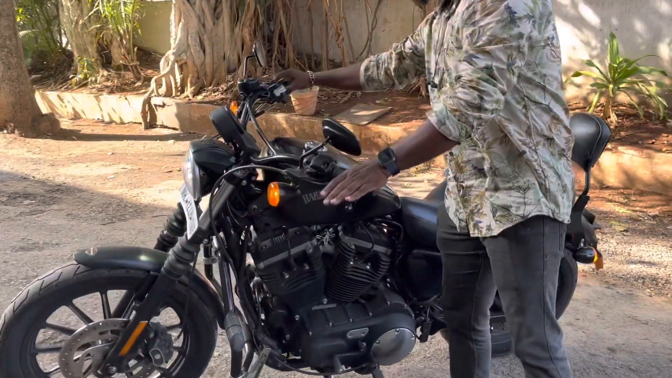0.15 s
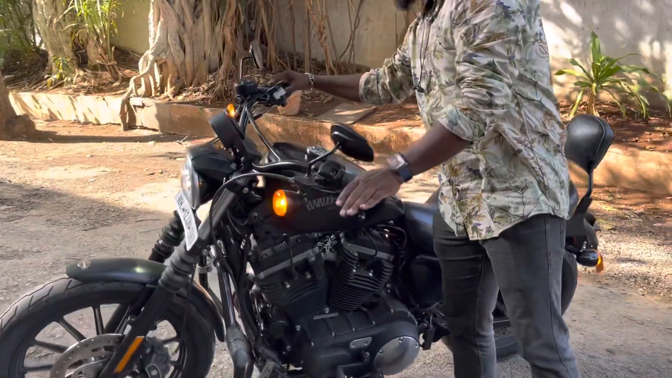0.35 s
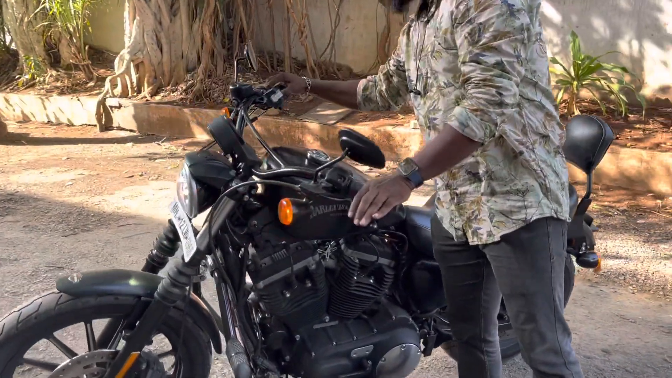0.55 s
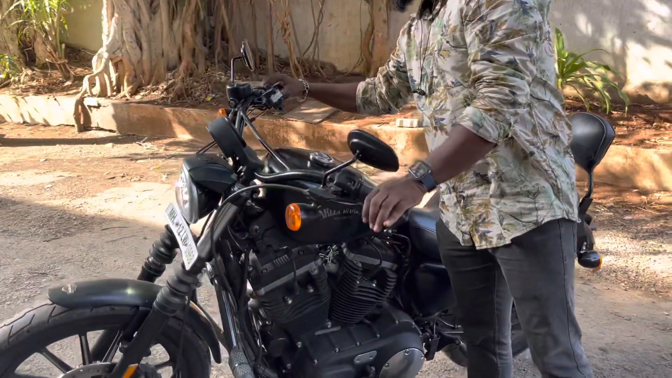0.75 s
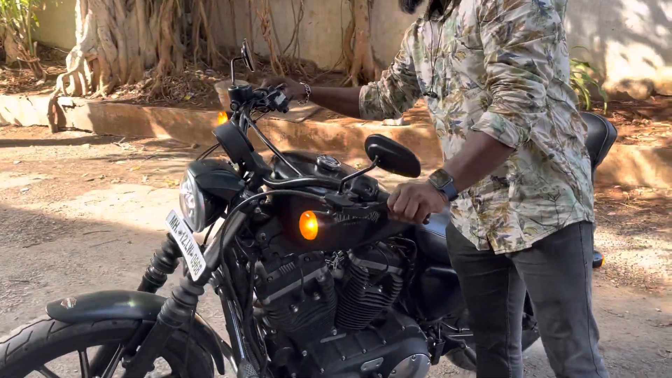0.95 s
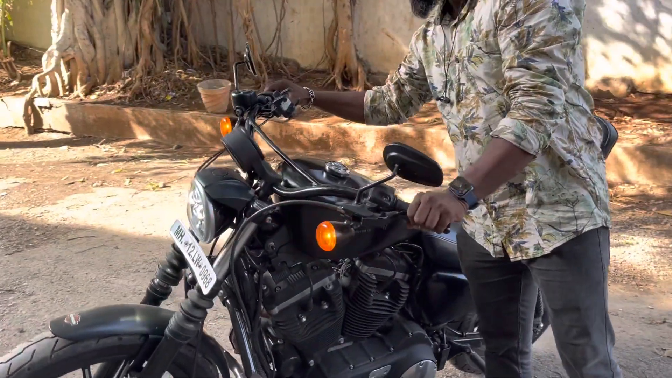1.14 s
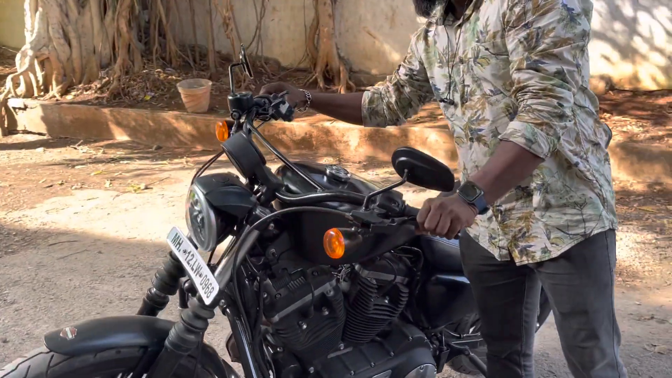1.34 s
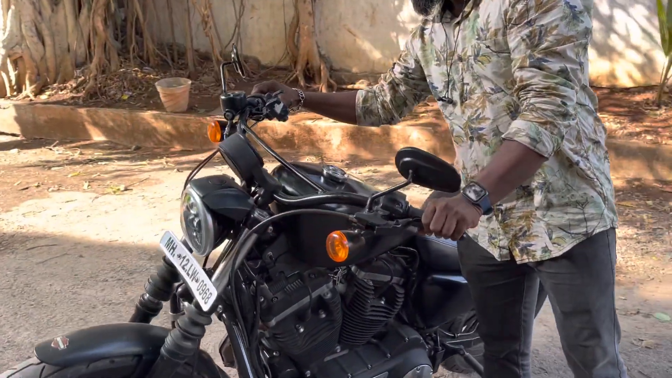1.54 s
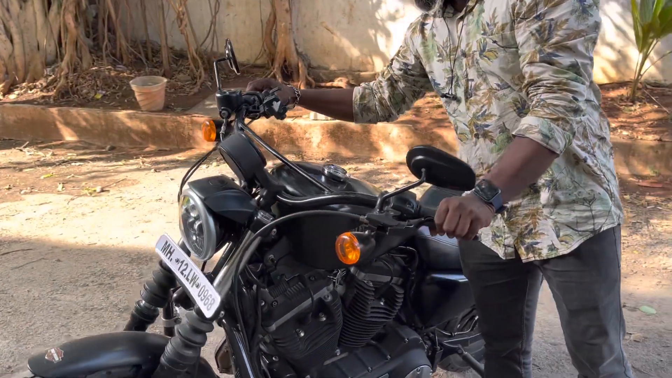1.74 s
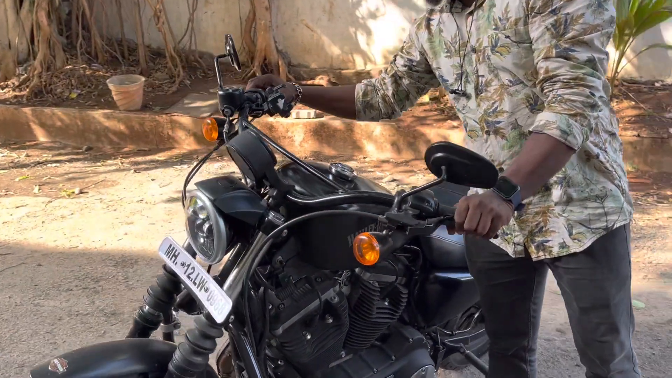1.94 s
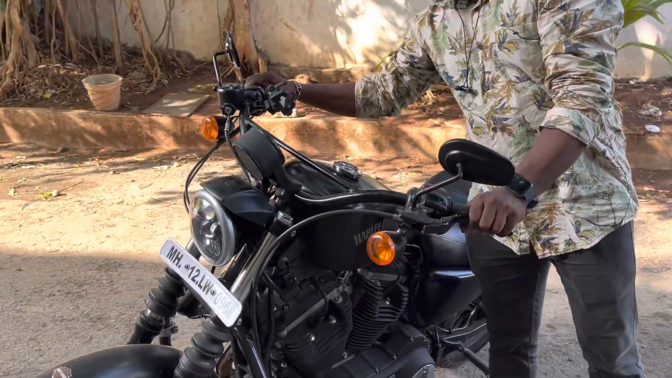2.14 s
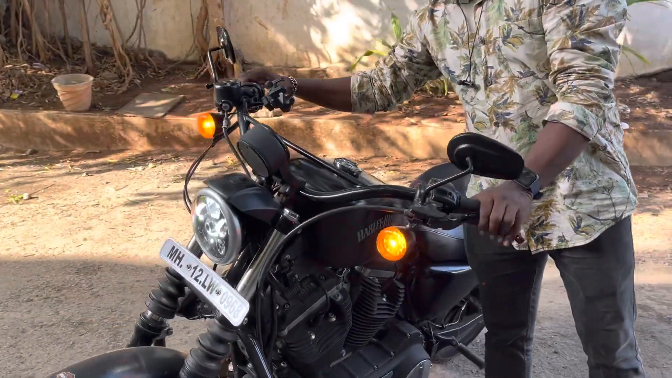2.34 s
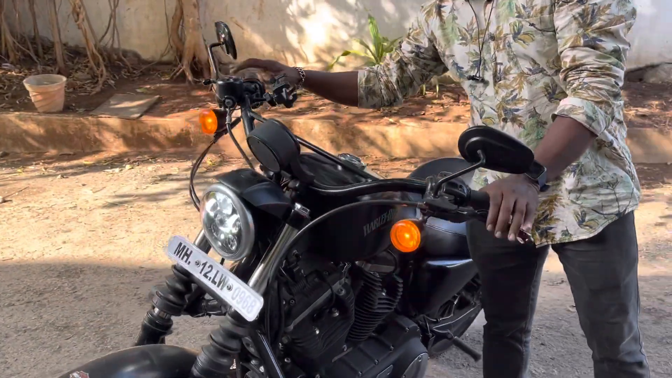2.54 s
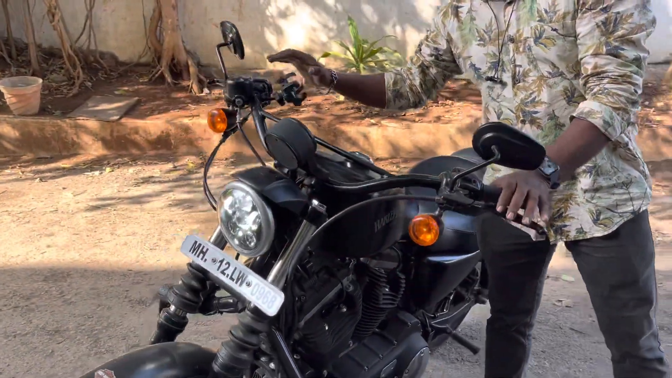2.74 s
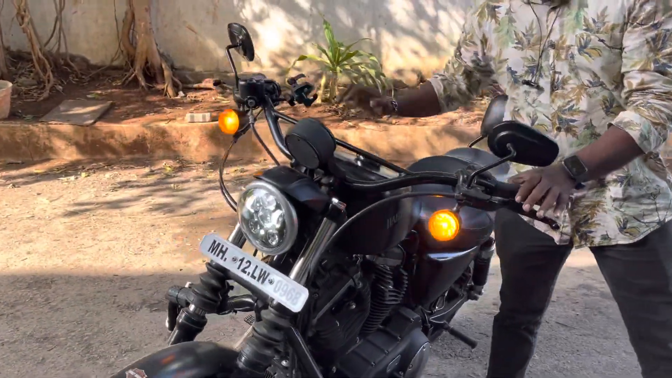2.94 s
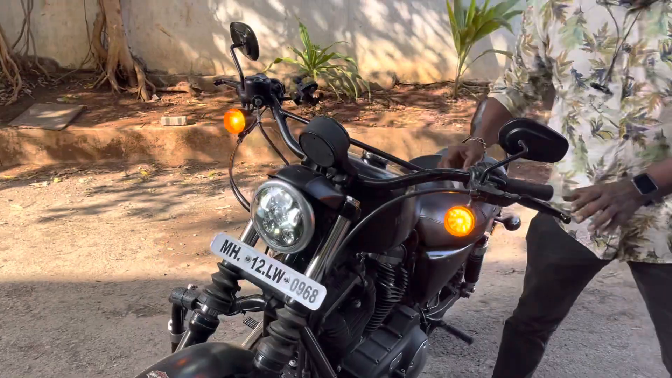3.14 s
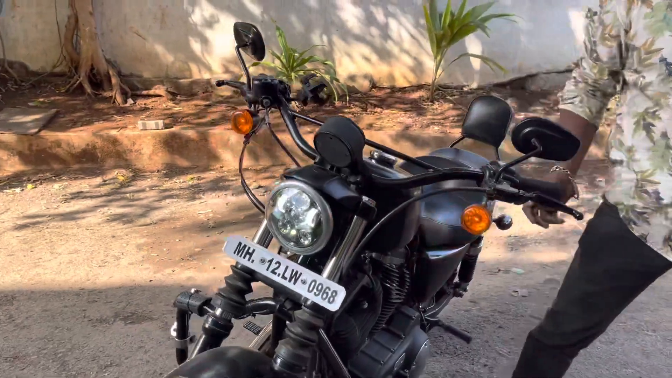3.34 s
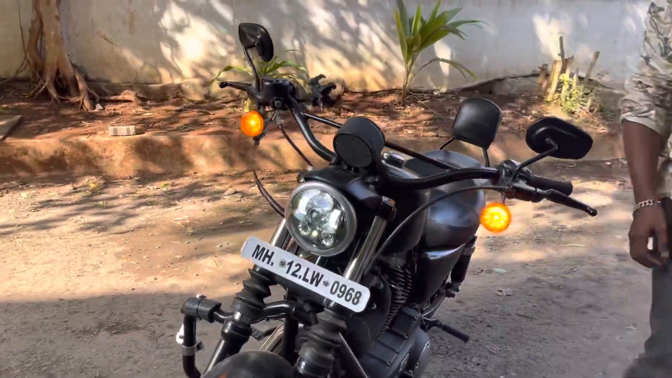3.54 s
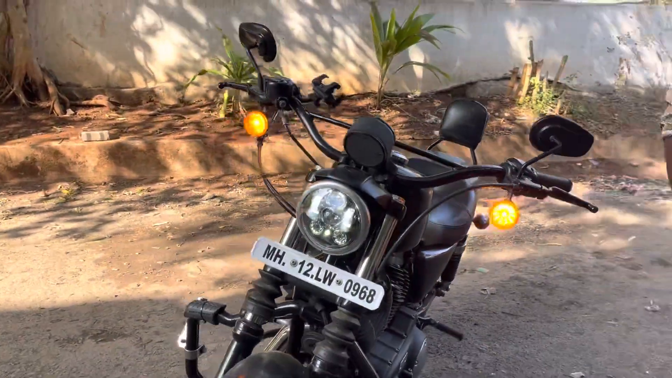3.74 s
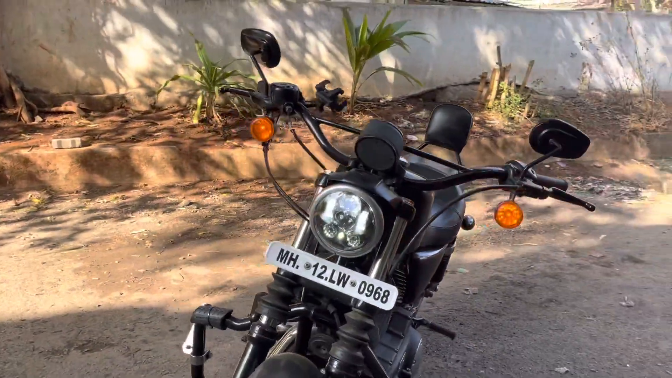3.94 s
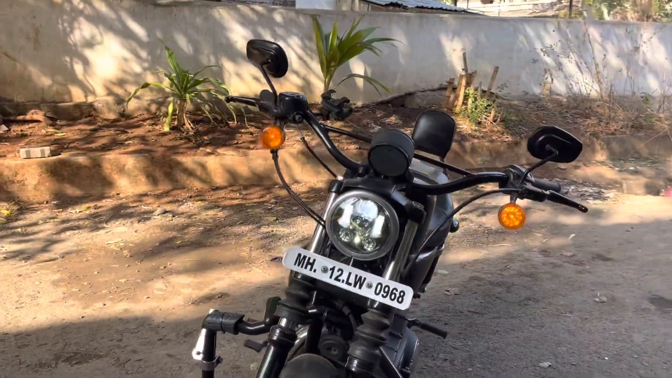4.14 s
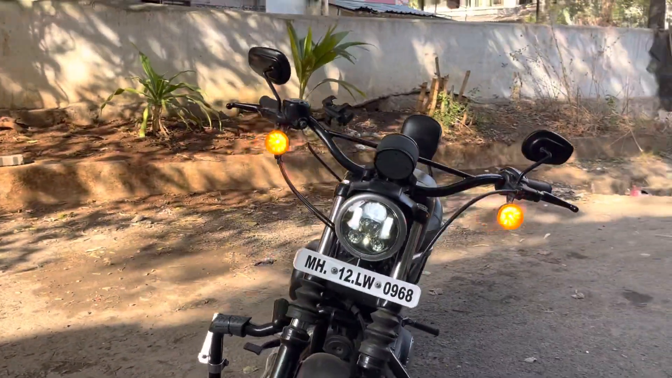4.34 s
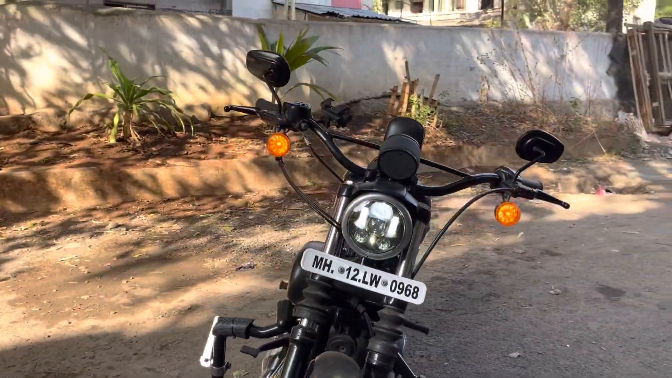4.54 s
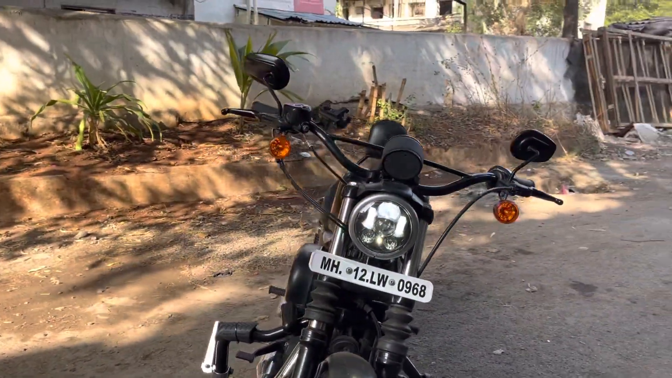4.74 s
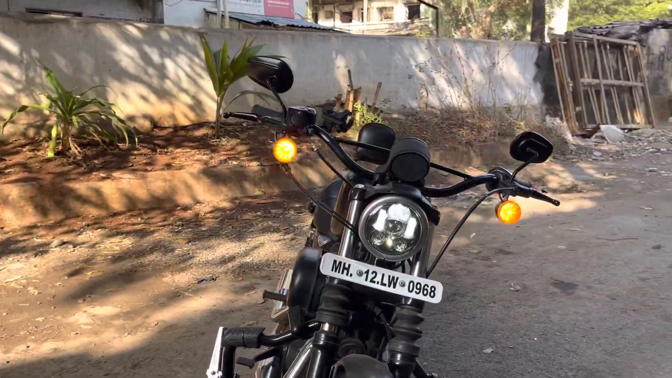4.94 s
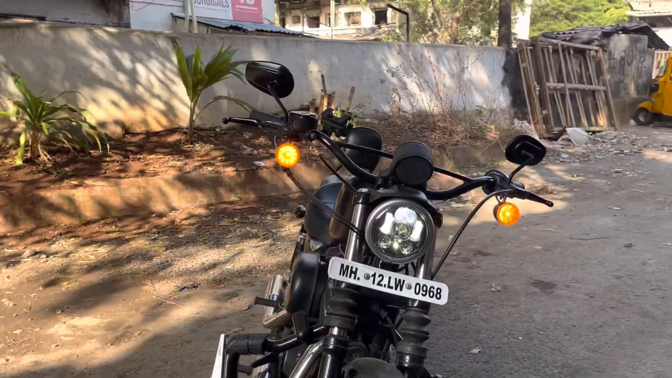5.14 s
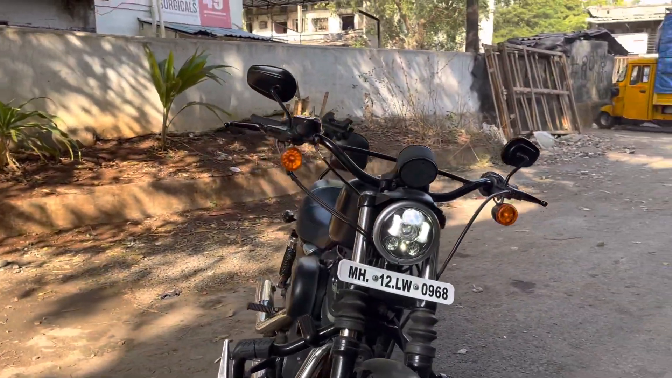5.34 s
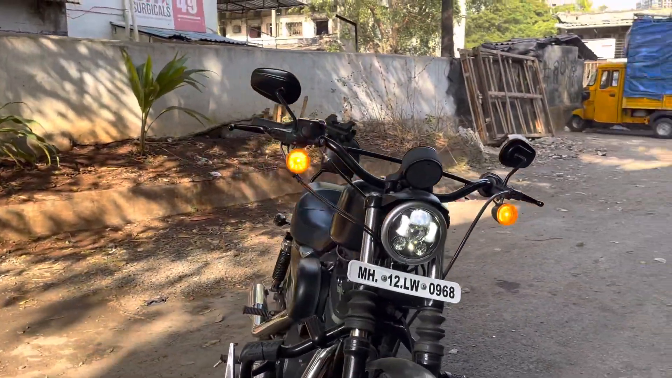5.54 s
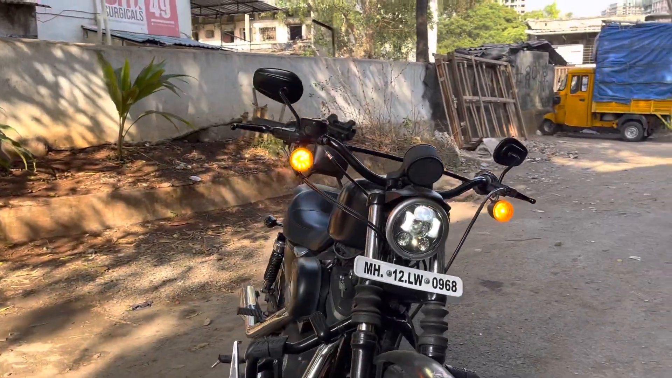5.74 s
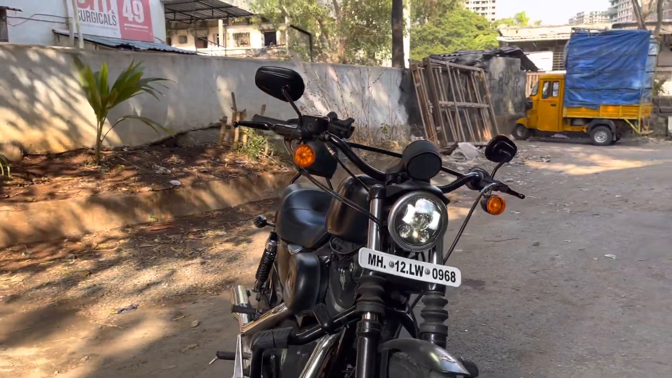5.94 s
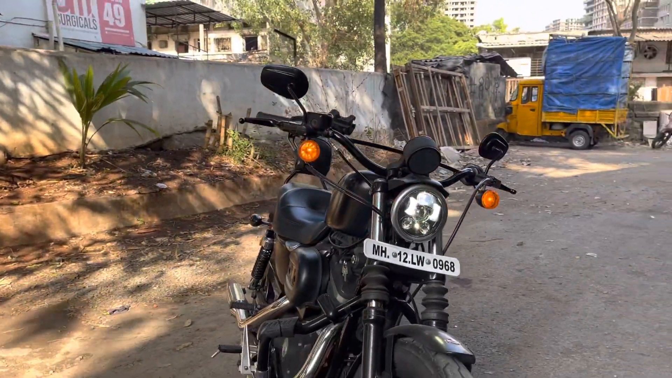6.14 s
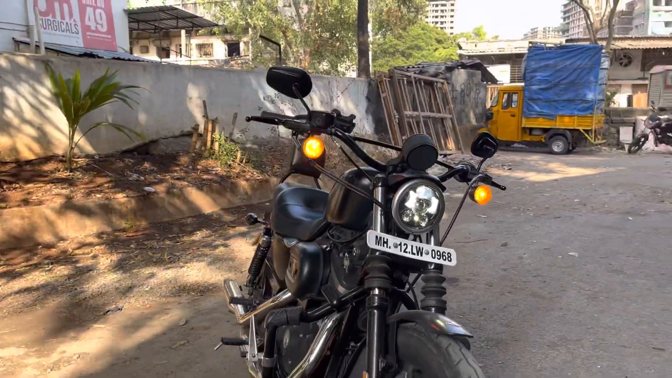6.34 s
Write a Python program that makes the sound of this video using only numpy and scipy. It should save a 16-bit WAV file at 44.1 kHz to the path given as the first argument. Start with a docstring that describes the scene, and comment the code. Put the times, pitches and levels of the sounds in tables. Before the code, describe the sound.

In a quiet walled yard, a click and scuff precede a harsh starter grind; a big twin engine barks awake, revs up and sinks into lumpy idle.

```python
"""A V-twin motorcycle starts in a walled yard, heard close by on a stereo microphone carried round to the front wheel.
The engine catches, flares and sinks to a fast idle: crank-timed firings boom and bark off the walls in echoes,
while valve taps and firings excite noise and resonances for clatter and fins, duller toward the front. Before it
a switch ticks, the solenoid slams (struck modes and noise) and the starter grinds (tooth impulses and squeals).
Thumps, ticks and a gritty scuff are dying noise and tones; shaped noise makes the rumble and hiss of the yard."""
import sys
import numpy as np
from scipy import signal
from scipy.fft import rfft, irfft, next_fast_len
from scipy.io import wavfile
from scipy.ndimage import map_coordinates

SR = 44100
rng = np.random.default_rng(int(sys.argv[2]) if len(sys.argv) > 2 else 0)


def log_audio(samples):
    """Write samples as a 16-bit WAV file to the path given in sys.argv[1]."""
    # one column per channel
    frames = np.atleast_2d(samples).T
    # limit to full scale, then quantise
    limited = np.clip(frames, -1, 1)
    pcm = np.round(limited * 32767).astype(np.int16)
    wavfile.write(sys.argv[1], SR, pcm)


N = 281358
TIME = np.arange(N) / SR
SIZE = next_fast_len(N + SR // 2, True)
HZ = np.fft.rfftfreq(SIZE, 1 / SR)

# Engine speed as it catches, flares and sinks to idle: (time [s], four-stroke cycle rate [1/s])
ENGINE_SPEED = [(2.02, 8.42), (2.096, 9.12), (2.234, 14.43), (2.479, 17.09), (2.832, 17.82), (3.504, 14.97),
                (4.229, 12.63), (4.987, 12.35), (6.38, 12.44)]
# How far the engine is hidden as the microphone rounds the front wheel: (time [s], hidden share [0-1])
HIDDEN_SHARE = [(2.2, 0.056), (3.15, 0.33), (3.7, 0.63), (4.55, 0.9), (5.1, 0.82), (6.3, 0.74)]
# Two firings about 315 degrees apart: (place in the cycle [cycles], size [relative])
FIRING_CAMS = [(.13, 0.73), (.57, 0.8)]
# Valves open and seat: (place in the cycle [cycles], size [relative])
VALVE_CAMS = [(.11, .9), (.44, 1), (.53, 0.36), (.7, .9), (.82, 0.77)]
# Parts of the clatter, before small trims:
# (idle level in full view [dB], change at full flare [dB], change when fully hidden [dB])
CLATTER_LEVELS = {"rasp": (-29, 1.25, -3.5), "fins": (-30.5, 2, -6.5), "valves": (-34, -0.5, -13.5),
                  "ring": (-48, 2.5, 2.5), "clinks": (-41, -1.5, -12)}
# Spectrum of the rasp: (frequency [Hz], relative level [dB])
RASP_SPECTRUM = [(210, -14), (350, -3.5), (449, -4.5), (640, -2), (746, -4), (1230, -8.5), (1410, -12),
                 (1570, -7.5), (2180, -17.5), (2320, -11.5), (2400, -15), (3120, -24), (5280, -120)]
# Spectrum of the knocking engine cases: (frequency [Hz], relative level [dB])
CASE_SPECTRUM = [(1100, -33), (1850, -5.5), (2150, -13.5), (2550, -3.5), (2850, 0.5), (3200, 1),
                 (3700, -3.5), (4500, -5.5), (5200, -5.5), (6500, -22), (11000, -85)]
# Cooling-fin resonances: (frequency [Hz], width [Hz], relative level [dB])
FIN_MODES = [(1933, 31, -5), (2673, 17, 2.5), (2822, 16, 1), (2855, 40, -1.5), (3161, 44, -1),
             (3300, 17, -2), (3428, 41, -3), (3966, 47, -5.5)]
# Spectrum of the valve gear: (frequency [Hz], relative level [dB])
VALVE_SPECTRUM = [(3000, -39), (4500, -3.5), (6200, -4.5), (7000, -4.5), (8500, -14), (10000, -7),
                  (12500, -9.5), (14000, -16), (15700, -26)]
IDLE_RATE, FLARE_RATE = 12.5, 17  # cycles a second


def engine():
    """The crank times the firings and the valve taps, which shake the cases and ring the fins."""
    speed, = curves(ENGINE_SPEED)
    hidden, = curves(HIDDEN_SHARE)
    flare = np.clip((speed - IDLE_RATE) / (FLARE_RATE - IDLE_RATE), 0, 1)
    gain = {}
    for part, (idle_db, flare_db, hidden_db) in CLATTER_LEVELS.items():
        gain[part] = amp(idle_db + flare_db * flare + hidden_db * hidden)
    running = TIME > ENGINE_SPEED[0][0]
    turns = np.cumsum(speed * running) / SR + .007 * wobble(16)
    firings = strikes(turns, FIRING_CAMS, scatter_db=1.5)
    taps = strikes(turns, VALVE_CAMS, scatter_db=3.5)

    rasping = bursts(firings + 1.5 * taps, decay=0.012, steady=1.7) * air()
    rasp = gain["rasp"] * coloured(rasping, RASP_SPECTRUM)
    blows = bursts(taps + .7 * firings, decay=.008, steady=1.3)
    knocking = tappets(turns, decay=.02, steady=.8, scatter_db=2)
    cases = gain["fins"] * amp(-2.5) * coloured(knocking, CASE_SPECTRUM)
    fins = gain["fins"] * amp(-2.5) * ringing(blows * air(), FIN_MODES)
    ring = gain["ring"] * ringing(blows * air(), [(2462, 9, 0), (2433, 9.8, -1)])
    loose = gain["clinks"] * unit(clinks(taps + firings, centre_hz=2400, spread=.36, t60=.04))
    ticking = tappets(turns, decay=.014, steady=1.1, scatter_db=3)
    valves = gain["valves"] * amp(1.1 * wobble(9)) * coloured(ticking, VALVE_SPECTRUM)

    clatter = rasp + cases + fins + ring + loose + singing(blows) + valves
    vigour = np.minimum(speed / 15, 1)  # the clatter grows as the engine picks up
    return running * (exhaust(turns, firings, speed, flare) + vigour * clatter)


# The pipes answer best at idle and at full flare: (cycle rate [1/s], level before receding [dB])
BOOM_LEVEL = [(12.5, -14), (14.8, -16), (17.3, -14)]
# Boom harmonics at idle: (multiple of the cycle rate [1], relative level [dB])
IDLE_HARMONICS = [(3, -16.5), (4, -7.5), (5, -2), (6, -2.5), (7, -29), (8, -5.5), (9, 1.5), (10, -16),
                  (11, -12.5), (12, -17), (13, -18.5), (14, -22), (15, -13)]
# Boom harmonics at full flare: (multiple of the cycle rate [1], relative level [dB])
FLARE_HARMONICS = [(3, -9), (4, -0.5), (5, 0.5), (6, 1), (7, -10), (8, -5), (9, 0), (10, -14), (11, -51),
                   (12, -6), (13, -7), (14, -18), (15, -17)]
# Spectrum of the gas rumble: (frequency [Hz], relative level [dB])
RUMBLE_SPECTRUM = [(20, -40.5), (35, -35.5), (50, -4.5), (75, -5), (120, -3), (170, -11.5), (300, -24.5),
                   (700, -67.5)]
# Spectrum of the bark in the exhaust pipe at idle: (frequency [Hz], relative level [dB])
BARK_SPECTRUM = [(100, -34.5), (160, -1), (195, -1.5), (260, -2.5), (310, -8.5), (380, -21.5), (560, -26.5),
                 (850, -38.5), (2000, -74)]
# Echoes off the yard walls: (delay [s], gain [relative])
WALL_ECHOES = [(0.0172, 0.36), (0.025, 0.26)]
BARK_DB, BARK_FLARE_DB = -25.5, 0.8  # at the catch, more at full flare
# the microphone leaves the pipes behind
BOOM_RECEDE_DB_PER_S, BARK_RECEDE_DB_PER_S = -1.28, -1.5
PIPE_DELAY = .06  # share of a cycle by which the boom trails the firing
CATCH_RISE_S = 0.066  # the first charges burn weakly


def exhaust(turns, firings, speed, flare):
    """The paired firings boom on low orders of the cycle, bark in the pipe and stir a rumble of gas."""
    age = np.maximum(TIME - ENGINE_SPEED[0][0], 0)
    boom_db = along(BOOM_LEVEL, speed) + BOOM_RECEDE_DB_PER_S * age
    bark_db = BARK_DB + BARK_FLARE_DB * flare + BARK_RECEDE_DB_PER_S * age

    boom = np.zeros(N)
    for (k, idle_db), (_, flare_db) in zip(IDLE_HARMONICS, FLARE_HARMONICS):
        pair = sum(size * np.exp(-2j * np.pi * k * place) for place, size in FIRING_CAMS)
        lag = 0.0602 * k * k  # the silencer delays the higher orders and so smears each push
        phase = 2 * np.pi * k * (turns - PIPE_DELAY) + np.angle(pair) - lag
        boom += amp(idle_db + flare * (flare_db - idle_db)) * np.cos(phase)
    boom = unit(boom * amp(1.8 * wobble(26)))  # no two charges burn alike

    gusts = bursts(firings, decay=.014, steady=.4) * air()
    rumble = amp(-3.5 - 2 * flare + 0.93 * wobble(12)) * coloured(gusts, RUMBLE_SPECTRUM)

    puffs = bursts(firings, decay=.014, steady=.4) * air()
    gas = unit(firings / np.sqrt(speed)) + .5 * puffs
    hot = [(1.15 * hz, db) for hz, db in BARK_SPECTRUM]  # hotter gas raises the pipe's resonances
    cool_share = np.sqrt(1 - flare)
    bark = cool_share * coloured(gas * cool_share, BARK_SPECTRUM) + flare * coloured(gas, hot)
    bark = unit(filtered(bark, wall_response))

    caught = 1 - np.exp(-age / CATCH_RISE_S)
    return caught ** 2 * amp(boom_db) * (boom + rumble) + amp(bark_db) * bark


def wall_response(hz):
    """Direct sound plus a delayed, weaker copy from each wall echo."""
    return 1 + sum(gain * np.exp(-2j * np.pi * hz * delay) for delay, gain in WALL_ECHOES)


def tappets(turns, decay, steady, scatter_db):
    """Each valve tap and firing gets its own dense ring, the same every time, over a steady hiss."""
    t = TIME[:SR // 8]
    grain, out = air(), np.zeros((2, N))
    for k, cam in enumerate(VALVE_CAMS + FIRING_CAMS):
        answer = grain[:, k * len(t):][:, :len(t)] * np.exp(-t / decay)
        out += signal.oaconvolve(strikes(turns, [cam], scatter_db)[None], answer, axes=1)[:, :N]
    return unit(unit(out) + steady * air())


# Thin parts of the bike sing out for a moment, each at its own time; levels before the engine's vigour:
# (centre time [s], length [s], clean tone level [dB], rattling ring level [dB],
#  frequency at the centre [Hz], glide [Hz/s])
SINGING_PARTS = [(2.661, 0.25, -29.5, -41, 2461, -22), (2.66, 0.28, -36, -43, 2440, -24),
                 (2.72, 0.32, -36, -50, 2811, 18), (2.874, 0.41, -39, -48, 2666, 16),
                 (2.75, 0.68, -57, -44.5, 6190, 0), (2.68, .3, -46, -43.5, 5400, 0),
                 (4.2, 0.75, -45, -41.5, 3090, -62), (4.25, 1, -45, -39.5, 1525, -38.5)]


def singing(blows):
    """A thin part swells into a wavering tone, rattled by the blows, and dies away again."""
    out, shaking = np.zeros((2, N)), blows * air()
    for s, length, tone_db, ring_db, hz, glide in SINGING_PARTS:
        t = TIME - s
        waver = .8 * wobble(22)
        tone = amp(tone_db) * np.sin(2 * np.pi * t * (hz + glide * t / 2) + waver)
        ring = amp(ring_db) * ringing(shaking, [(hz, 40, 0)])
        swell = np.exp(-(2 * t / length) ** 4)
        out += swell * (tone + ring)
    return out


# The starter gears take up load; squeal and ring levels are relative to the surge:
# (peak time [s], surge level [dB], decay [s], squeal frequency [Hz], squeal sag [Hz/s],
#  squeal level [dB], housing ring frequency [Hz], housing ring level [dB])
LOAD_SURGES = [(1.542, -25, 0.013, 1260, 2000, -23, 3370, -2),
               (1.599, -21.5, 0.011, 1263, 4500, 0.5, 2440, -7),
               (1.657, -23, 0.024, 1300, 2500, -4, 2400, -6),
               (1.683, -23, 0.013, 1127, 11100, 2.5, 3070, -2), (1.699, -26.5, .012, 962, 7000, 5, 1900, 4),
               (1.811, -17.5, 0.0094, 1360, 8050, -3, 2860, -17),
               (1.826, -27.5, 0.02, 930, 6070, -10, 5460, -5),
               (1.957, -26, 0.0066, 3050, 5000, 4, 3050, -4), (1.964, -21, .011, 1320, 5000, 1.5, 2840, -3),
               (1.986, -25, 0.012, 1257, 2000, -1.5, 3570, -1)]
# Spectrum of the starter's whirr: (frequency [Hz], relative level [dB])
WHIRR_SPECTRUM = [(180, -13.5), (300, -6), (509, -15), (590, -5), (1280, -3.5), (1670, -8), (1870, -3.5),
                  (2170, -9), (3570, -5), (6360, -12.5), (8140, -15), (12100, -23.5), (15500, -33)]
# Starter housing resonances: (frequency [Hz], width [Hz], relative level [dB])
HOUSING_MODES = [(890, 110, -13), (1290, 76, 2), (1840, 44, -11), (2480, 39, 0), (2820, 44, 9),
                 (3190, 160, -3), (3520, 120, 0), (5720, 770, -5)]
CRANK_FROM_S, CRANK_TO_S, CRANK_RELEASE_S = 1.25, 2.25, 0.047  # the starter's steady whirr
CRANK_DB, CRANK_GROWS_DB_PER_S = -35.5, 12.5  # level midway; it grows as the crank gains speed
# it labours while it gets the crank moving
SPIN_UP_HOLD_S, SPIN_UP_DB, SPIN_UP_RELEASE_S = 0.15, -26.5, 0.031
SURGE_RISE = 0.47  # rise time over decay time


def starter():
    """Gear teeth chatter and squeal, hardest as each piston comes up against compression."""
    spin_up = amp(SPIN_UP_DB) * held(CRANK_FROM_S, CRANK_FROM_S + SPIN_UP_HOLD_S, SPIN_UP_RELEASE_S)
    since_midway = np.minimum(TIME, CRANK_TO_S) - (CRANK_FROM_S + CRANK_TO_S) / 2
    crank_db = CRANK_DB + CRANK_GROWS_DB_PER_S * since_midway
    cranking = amp(crank_db) * held(CRANK_FROM_S, CRANK_TO_S, CRANK_RELEASE_S)

    load, squeal = np.zeros(N), np.zeros(N)
    waver, shudder = .6 * wobble(300), .9 * wobble(260)
    for s, db, decay, hz, sag, squeal_db, ring_hz, ring_db in LOAD_SURGES:
        t = TIME - s
        surge = amp(db) * np.exp(-np.maximum(-t / SURGE_RISE, t) / decay)
        load += surge
        slowing = 2 * np.pi * t * (hz - sag * t / 2)  # the load slows the gears
        squeal += surge * amp(squeal_db) * np.sin(slowing + waver)
        squeal += surge * amp(ring_db) * np.sin(2 * np.pi * ring_hz * t + shudder)

    tooth_rate = 310 * amp(1.5 * wobble(40))  # teeth a second
    teeth = strikes(np.cumsum(tooth_rate) / SR, [(0.0077, 1)], scatter_db=2.5)
    chatter = bursts(teeth, decay=0.003, steady=.5)
    whirr_level = np.maximum(spin_up, cranking) + amp(-2) * load
    whirr = coloured(chatter * air() * whirr_level, WHIRR_SPECTRUM)
    effort = load + .5 * spin_up
    housing = amp(-8) * ringing(effort * chatter * air(), HOUSING_MODES)
    # loose metal in the starter
    rattle = amp(-13.5) * clinks(unit(teeth) * effort, centre_hz=2700, spread=.55, t60=.035)
    return whirr + housing + squeal + rattle


# Modes of the solenoid's plunger, relative to the slam: (frequency [Hz], level [dB], t60 [s])
PLUNGER_MODES = [(950, -10, 0.015), (1276, -21.5, 0.13), (3410, -21, 0.071), (4330, -0.5, 0.016),
                 (6210, -11.5, 0.044), (6700, -14, 0.027), (7500, -7, .022)]
SLAM_S, SLAM_DB, SLAM_ATTACK_S = 1.2522, -1, 0.0013


def solenoid_slam():
    """The solenoid's plunger hits its stop and sets its modes ringing."""
    return sum(amp(SLAM_DB + db) * damped(SLAM_S, t60, hz, SLAM_ATTACK_S) for hz, db, t60 in PLUNGER_MODES)


# Steel slams on steel: (time [s], crack level [dB], t60 [s], pinion ring level [dB])
STEEL_CLACKS = [(1.2455, -26, 0.066, -27), (1.2531, -7.5, 0.015, -28), (1.2753, -13.5, 0.026, -11.5),
                (2.021, -20, 0.03, -40), (2.139, -17.5, 0.015, -25), (2.1913, -13, 0.026, -11)]
# Spectrum of the crack: (frequency [Hz], relative level [dB])
CRACK_SPECTRUM = [(300, -26), (850, -3), (1400, 0), (1900, -7), (2600, -5), (3500, 2.5), (4450, 2),
                  (5300, -8), (6400, -11), (7500, 4), (11000, -5.5), (15500, -11)]
# Pinion resonances: (frequency [Hz], width [Hz], relative level [dB])
PINION_MODES = [(915, 130, -1), (1865, 81, 4.5), (2500, 71, -2.5), (3500, 260, -14), (4240, 190, -2)]


def steel_clacks():
    """Solenoid and pinion: dying noise cracks broadly and also rings the pinion's resonances."""
    crack = sum(amp(db) * fading(s, t60) for s, db, t60, _ in STEEL_CLACKS)
    ring = sum(amp(db) * fading(s, t60) for s, _, t60, db in STEEL_CLACKS)
    return coloured(air() * crack, CRACK_SPECTRUM) + ringing(air() * ring, PINION_MODES)


# Small sharp ticks, later from loose metal on the shaking bike: (time [s], level [dB], t60 [s])
SHARP_TICKS = [(0.447, -28, 0.035), (4.968, -37, 0.12), (5.09, -37, .05), (5.287, -40, 0.078),
               (5.497, -39, .06), (5.578, -36, .05), (5.737, -39, .04), (5.774, -36, 0.065),
               (6.058, -31.5, 0.067)]
# Spectrum of a tick: (frequency [Hz], relative level [dB])
TICK_SPECTRUM = [(1500, -9), (4500, 5), (7000, -4), (11000, 0), (15500, -13)]


def sharp_ticks():
    """Each tick is a sudden, quickly dying burst of bright noise."""
    tick = sum(amp(db) * fading(s, t60) for s, db, t60 in SHARP_TICKS)
    return coloured(air() * tick, TICK_SPECTRUM)


# Dull thumps and heavy beats, levels before the trims of each part:
# (time [s], thump level [dB], t60 of all but the swoop [s], hollow ring level [dB], boom frequency [Hz])
DULL_THUMPS = [(0.08, -23.5, 0.26, -49, 74.6), (0.336, -26, 0.2, -27, 130), (1.303, -21.5, 0.21, -24, 127),
               (1.389, -23, 0.34, -24.5, 105.4), (1.819, -25, 0.29, -27, 97), (2.021, -20, 0.062, -28, 182),
               (2.079, -10, 0.079, -32, 66), (3.138, -9, 0.16, -22, 108), (4.04, -10.5, 0.074, -25.5, 100),
               (4.067, -16, 0.11, -17, 89), (4.092, -14, 0.071, -18, 110), (4.169, -14, 0.13, -21, 88.5),
               (4.208, -17.5, 0.092, -40, 88), (4.295, -17, 0.071, -18.5, 105),
               (4.339, -11.5, 0.22, -35, 100), (4.365, -8, 0.11, -13.5, 121), (5.338, -10, 0.13, -39, 82),
               (5.869, -13.5, 0.095, -33, 69)]
# Spectrum of a thump's airy part: (frequency [Hz], relative level [dB])
KNOCK_SPECTRUM = [(25, -25), (70, 6.5), (130, 1), (250, -1), (450, -21), (800, -42), (2000, -65)]
# Spectrum of a thump's hollow ring: (frequency [Hz], relative level [dB])
HOLLOW_SPECTRUM = [(150, -30), (330, 9), (480, 8), (620, -2.5), (900, -18), (2000, -46)]
BOOM_TRIM_DB, RUSH_TRIM_DB = -1, -2  # pitched and airy parts of a thump
SWOOP_HZ, SWOOP_S, SWOOP_DB = 600, .006, 8  # a hollow thump swoops down to its boom


def dull_thumps():
    """A thump sounds as a low dying tone, a rush of air, a hollow ring and a falling swoop."""
    rush, hollow, tones = np.zeros(N), np.zeros(N), np.zeros(N)
    for s, db, t60, hollow_db, hz in DULL_THUMPS:
        fall = fading(s, t60)
        rush += amp(db + RUSH_TRIM_DB) * fall
        hollow += .5 * amp(hollow_db) * fall
        tones += amp(db + BOOM_TRIM_DB) * damped(s, t60, hz, attack=0.0038)
        tones += amp(hollow_db + SWOOP_DB) * damped(s, 0.059, hz, attack=0.0038, swoop_hz=SWOOP_HZ)
    return coloured(air() * rush, KNOCK_SPECTRUM) + coloured(air() * hollow, HOLLOW_SPECTRUM) + tones


# Stones snap under the shoe: (time [s], level [dB])
GRIT_SNAPS = [(0.694, -27), (.716, -30.5)]


def scuff():
    """One short gritty scuff: a fluttering stroke of noise with sudden snaps."""
    stroke = amp(-37.5 + 4.5 * wobble(110.8)) * np.exp(-np.abs(TIME - .688) / 0.016)
    stroke += sum(amp(db) * fading(s, t60=0.015) for s, db in GRIT_SNAPS)
    return coloured(stroke * air(), [(600, -31), (1500, 2.5), (2500, -3), (4000, -11), (8000, -36)])


# Spectrum of the yard's background: (frequency [Hz], relative level [dB])
YARD_SPECTRUM = [(20, -31), (49, -7), (71, -1), (202, -11), (404, -15), (927, -26.5), (1540, -28),
                 (2430, -32.5), (2850, -31), (5140, -32), (8320, -46), (9020, -42.5), (15000, -59.5)]


def yard():
    """An uneven outdoor rumble with a faint hiss, as shaped noise."""
    return amp(-33 + 1.5 * wobble(15)) * coloured(air(), YARD_SPECTRUM)


# Likeness of the left and right channels of noise: (frequency [Hz], correlation [-1 to 1])
STEREO_LIKENESS = [(60, 0.97), (150, 0.9), (380, 0.82), (950, 0.62), (2500, 0.56), (4000, 0.39),
                   (5200, 0.076), (7000, 1), (12000, 1)]


def air():
    """White stereo noise whose left-right likeness varies with frequency."""
    likeness = np.clip(along(STEREO_LIKENESS, HZ), -1, 1)
    white = rng.standard_normal((2, 2 * len(HZ))).view(complex)
    shares = np.sqrt(SIZE * np.array([1 + likeness, 1 - likeness])) / 2
    mid, side = irfft(white * shares, SIZE)[:, :N]
    return np.array([mid + side, mid - side])


def amp(db):
    """Decibels to a linear gain."""
    return 10 ** (np.asarray(db) / 20)


def unit(x):
    """x scaled to an rms of 1."""
    return x / np.sqrt(np.mean(x ** 2) + 1e-20)


def along(points, hz):
    """(Hz, value) points interpolated on a log axis."""
    f, v = np.transpose(points)
    return np.interp(np.log(hz + 1), np.log(f + 1), v)


def curves(rows):
    """One value per sample for each column after the time."""
    s, *cols = np.transpose(rows)
    return [np.interp(TIME, s, c) for c in cols]


def wobble(rate):
    """A smooth random curve, rate knots a second."""
    return map_coordinates(rng.standard_normal(int(N * rate / SR) + 4), [TIME * rate])


def filtered(x, response):
    """x times a complex response of frequency."""
    return irfft(rfft(x, SIZE) * response(HZ), SIZE)[..., :N]


def coloured(x, spectrum):
    """x through a causal minimum-phase filter of unit energy with the given (Hz, dB) shape."""
    size = 16384
    magnitude = amp(along(spectrum, np.fft.rfftfreq(size, 1 / SR)))
    cepstrum = irfft(np.log(magnitude + 1e-6))
    cepstrum[1:size // 2] *= 2  # fold the cepstrum onto positive time
    cepstrum[size // 2 + 1:] = 0
    kernel = irfft(np.exp(rfft(cepstrum)))
    return signal.fftconvolve(np.atleast_2d(x), kernel[None] / np.linalg.norm(kernel), axes=1)[:, :N]


def ringing(x, modes):
    """x through (Hz, width, dB) resonances, keeping the power of white noise."""
    def response(f):
        total = 0
        for k, (centre, width, db) in enumerate(modes):
            damping = 1j * f * width
            total = total + (-1) ** k * amp(db) * damping / (centre * centre - f * f + damping)
        return total / np.sqrt(np.mean(np.abs(total) ** 2))
    return filtered(x, response)


def strikes(turns, cams, scatter_db):
    """An impulse whenever the shaft passes one of the (place in the cycle, size) cams."""
    out = np.zeros(N)
    for place, size in cams:
        at = np.flatnonzero(np.diff(np.floor(turns - place)) > 0)
        out[at] += size * amp(scatter_db * rng.standard_normal(len(at)))
    return out


def bursts(hits, decay, steady):
    """An envelope of rms 1: each hit dies away over a steady share."""
    dying = signal.lfilter([1], [1, -np.exp(-1 / (decay * SR))], hits)
    return unit(steady + unit(dying))


def clinks(hits, centre_hz, spread, t60):
    """Each hit rings a short metallic note of its own, scattered in pitch about the centre."""
    at = np.flatnonzero(hits)
    t = np.arange(SR // 25) / SR
    hz = np.minimum(centre_hz * np.exp(spread * rng.standard_normal((len(at), 1))), SR / 3)
    decay = amp(-60 * t / t60)
    notes = hits[at, None] * np.sin(2 * np.pi * hz * t) * decay * np.sqrt(2) / np.linalg.norm(decay)
    return np.bincount((at[:, None] + np.arange(len(t))).ravel(), notes.ravel(), N)[:N]


def fading(s, t60):
    """A sudden start at s and an exponential fall."""
    out, start = np.zeros(N), round(s * SR)
    span = slice(start, start + SR // 2)
    out[span] = amp(-60 * (TIME[span] - s) / t60)
    return out


def held(start, end, release):
    """Full from start to end, then an exponential fall."""
    return (TIME > start) * np.exp(-np.maximum(TIME - end, 0) / release)


def damped(s, t60, hz, attack, swoop_hz=0):
    """A struck mode: a quick rise at s, then a dying sine that may swoop down to its pitch."""
    out, start = np.zeros(N), round(s * SR)
    t = TIME[:min(SR // 2, N - start)]
    cycles = hz * t - swoop_hz * SWOOP_S * np.expm1(-t / SWOOP_S)
    out[start:start + len(t)] = np.sin(2 * np.pi * cycles) * amp(-60 * t / t60) * (1 - np.exp(-t / attack))
    return out


def scene():
    """The motorcycle, its starting noises and the yard around it."""
    contacts = solenoid_slam() + steel_clacks() + sharp_ticks() + dull_thumps()
    return engine() + starter() + contacts + scuff() + yard()


# Level difference of the microphone ports: (frequency [Hz], left minus right [dB])
PORT_LEVELS = [(60, 1.5), (250, 1.5), (600, 3), (2400, 0), (4600, 5), (6500, 0.6), (15000, -0.5)]
# Phase difference of the microphone ports: (frequency [Hz], left lead [rad])
PORT_PHASES = [(1100, 0), (1520, -2), (1800, -1), (3200, 1), (5000, 0.6), (5900, -1.1), (6800, -1),
               (7800, -3), (9200, -3.5), (10800, -5), (13200, -7), (14600, -9.5)]
TOP_HZ = 15750


def record(dry):
    """The two microphone ports differ in level and phase; peaks are rounded off and the band is limited."""
    def ports(hz):
        half = amp(along(PORT_LEVELS, hz) / 2) * np.exp(.5j * along(PORT_PHASES, hz))
        return np.array([half, 1 / half])
    x = filtered(dry, ports)
    x = x / (1 + np.abs(x / .92) ** 6) ** (1 / 6)
    return filtered(x, lambda hz: np.clip((TOP_HZ - hz) / 400 + .5, 0, 1))


dry = scene()
out = record(dry)
log_audio(out)
```